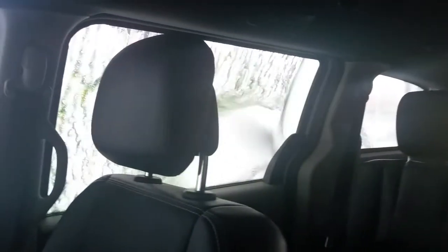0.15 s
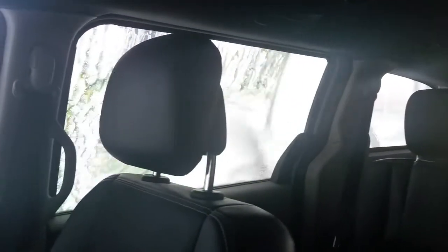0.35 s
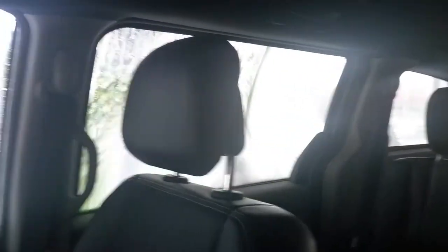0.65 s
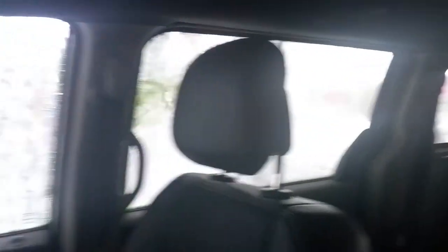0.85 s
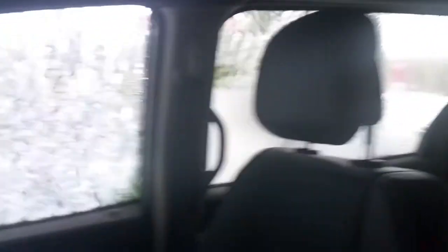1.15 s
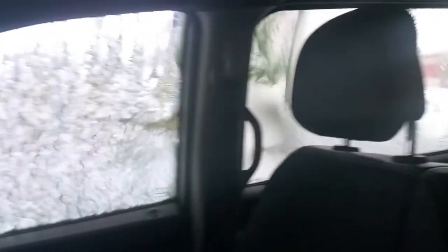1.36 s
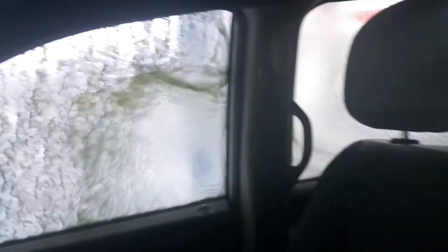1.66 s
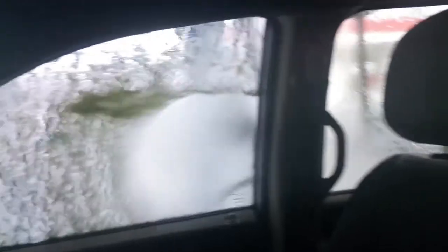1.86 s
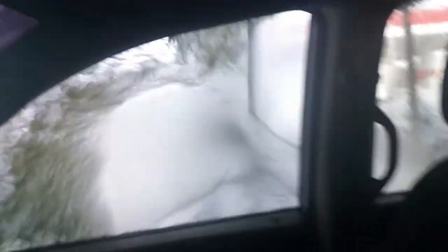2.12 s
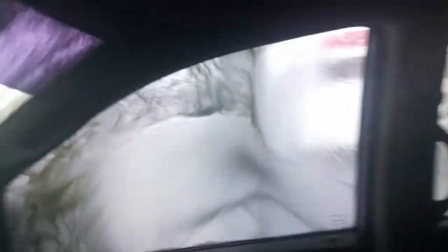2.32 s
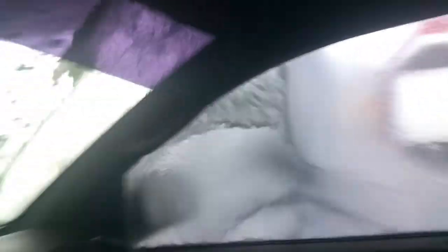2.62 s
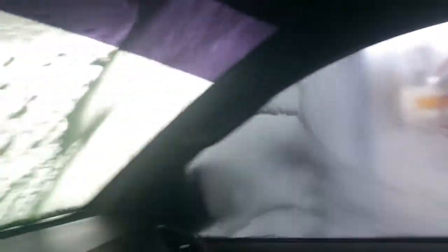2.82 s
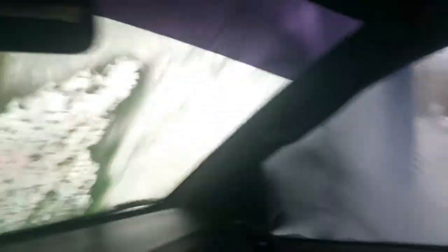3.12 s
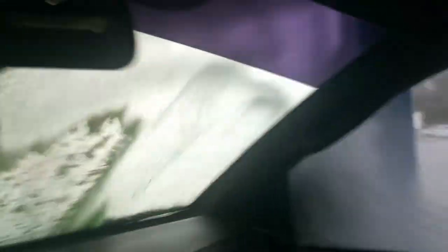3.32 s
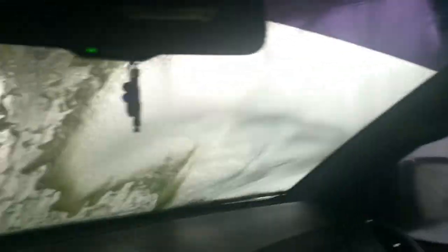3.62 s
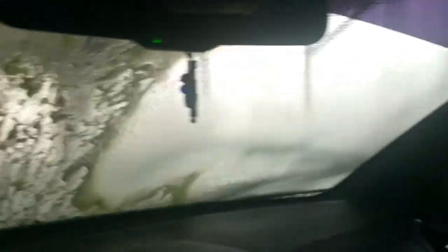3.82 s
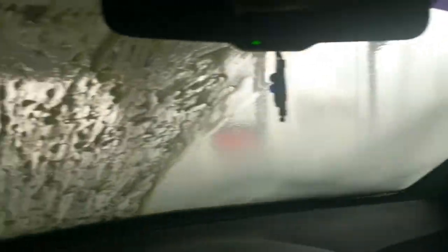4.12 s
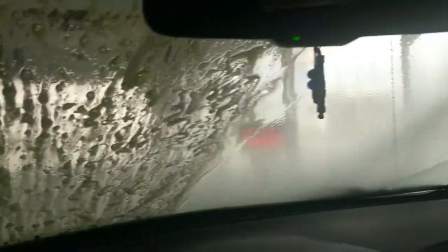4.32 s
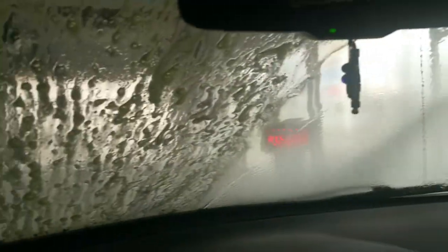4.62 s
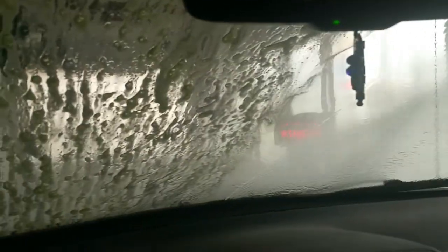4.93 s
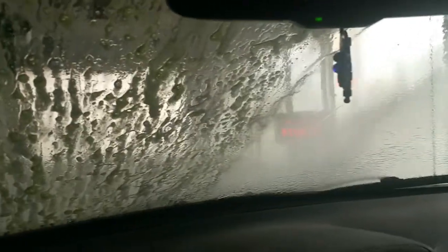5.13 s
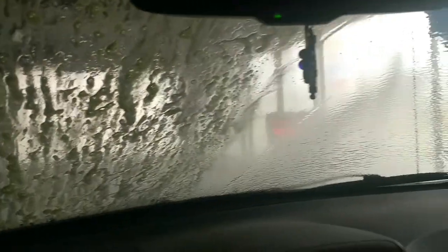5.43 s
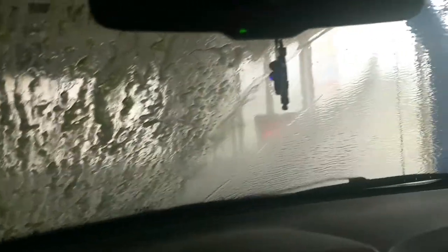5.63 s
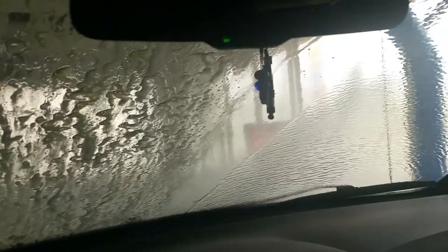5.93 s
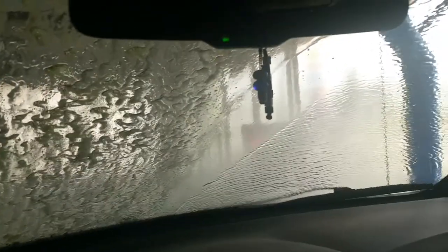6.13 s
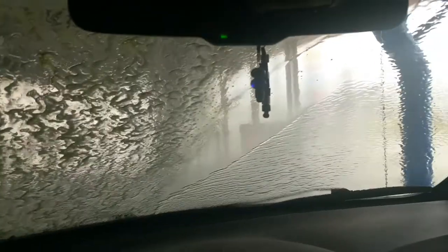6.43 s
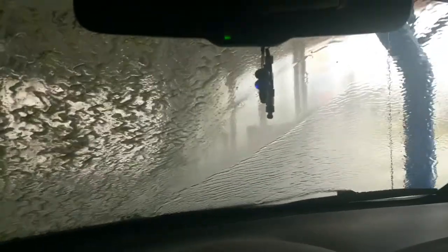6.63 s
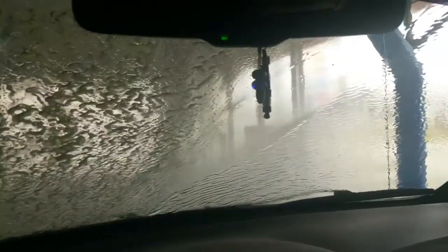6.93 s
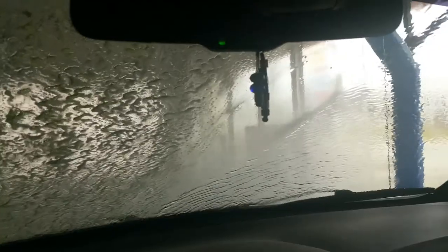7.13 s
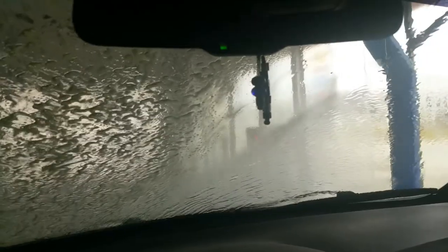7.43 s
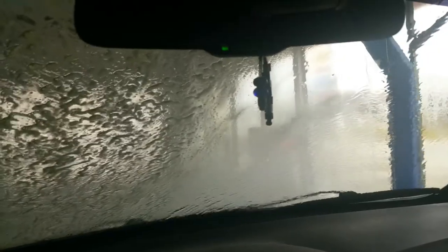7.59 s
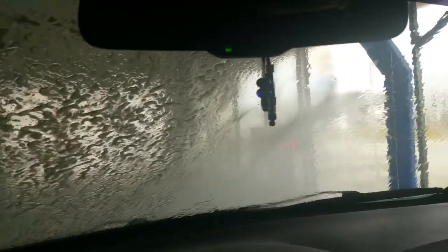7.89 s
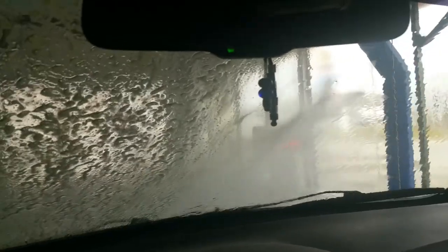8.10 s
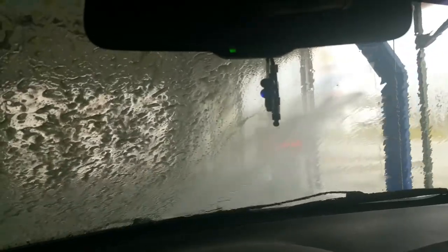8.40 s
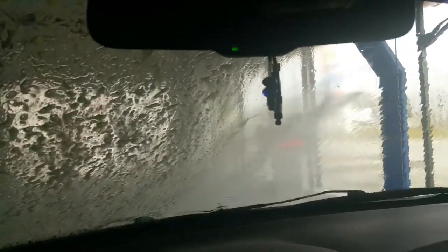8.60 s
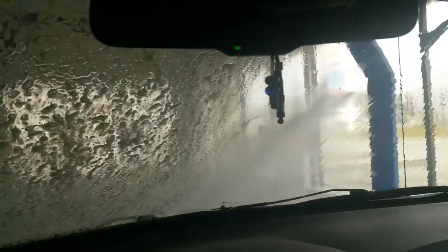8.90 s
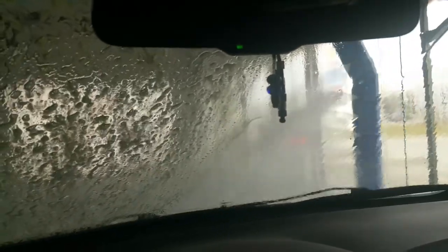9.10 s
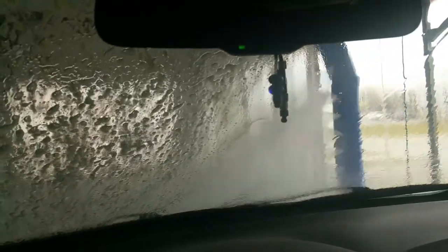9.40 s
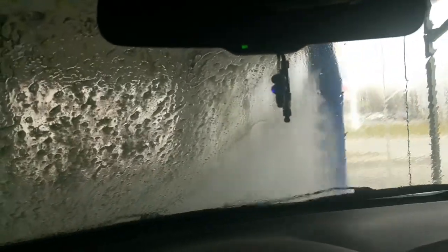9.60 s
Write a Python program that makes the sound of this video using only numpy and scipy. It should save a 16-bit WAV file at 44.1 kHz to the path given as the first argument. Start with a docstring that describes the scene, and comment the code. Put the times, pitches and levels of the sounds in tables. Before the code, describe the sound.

Car wash heard in a small enclosed cabin on a handheld phone: water roars steadily on doors and windows, panels thudding low beneath a grainy spray hiss. The sound surges as the jet crosses to the windscreen, then drops away within about a second and a half. Muffled rumbling, faint wavering motor tones and a weak dull hiss remain, with a small late knock.

```python
"""A low, uneven drumming under a steady hiss: the inside of a closed car swept by a high-pressure water jet.
The jet passes along the side windows, over the windscreen and off along the bonnet.
Its turbulent push, as noise through resonances, drums the panels and the cabin air in their modes;
dense random impulses make the droplets on the glass, shaped noise the duller splash through the shut body.
Faint wavering sines are motor tones, and a small knock falls late. Two close ports each colour the treble."""
import sys
import numpy as np
from scipy import signal
from scipy.fft import rfft, irfft, next_fast_len
from scipy.io import wavfile
from scipy.ndimage import map_coordinates

SR = 44100
rng = np.random.default_rng(int(sys.argv[2]) if len(sys.argv) > 2 else 0)


def wav_out(sig):
    """Save sig, one row per channel (or a flat mono array), as 16-bit PCM at SR to the path in sys.argv[1]."""
    wavfile.write(sys.argv[1], SR, np.round(np.clip(np.atleast_2d(sig).T, -1, 1) * 32767).astype(np.int16))


def magnitude_from_level(level_db):
    """Linear magnitude for a level in decibels (20 dB per decade)."""
    exponent = np.asarray(level_db, float) / 20
    return 10 ** exponent


N = 429975

# Push of the jet on the panels. Each row: time in seconds, level of the low modes in dB,
# level of the upper modes in dB.
PUSH = [(0.0, -20, -24), (0.32, -21, -22.5), (1.47, -20.5, -25), (2.09, -17.5, -20.5), (2.74, -17, -22.5),
        (2.99, -19.5, -25), (3.42, -21.5, -24.5), (3.96, -28, -31.5), (4.07, -28.5, -33.5),
        (4.56, -32, -39), (4.64, -25, -36.5), (5.21, -28, -38.5), (5.24, -29.5, -38), (6.19, -32.5, -42),
        (6.38, -31, -40.5), (7.0, -35.5, -45), (8.96, -37.5, -47), (9.67, -32, -40), (9.75, -32, -43)]
# Upper modes of the panels. Each row: frequency in Hz, width in Hz, then relative level in dB while
# the jet is on the rear door, the front door, the windscreen, the bonnet and the nose.
UPPER_MODES = [(364, 55, 2.5, 0, -8, -6, -8), (406.7, 47, 0.5, 3.5, -1.5, -1, -0.5),
               (465.5, 63, 0.5, 1, -3, -1.5, -6), (517, 65, 0.5, -4.5, -5.5, -7, -11),
               (575, 49, 2, -3.5, -5, -7.5, -7.5), (625, 94, -4, -4.5, -4, -6, -10),
               (669.4, 49, -3, -3.5, -5, -5.5, -5.5), (739.5, 83, -2.5, -2, -3.5, -6, -9),
               (813, 104, -4.5, -6.5, -6, -9, -10.5), (901, 220, -7.5, -10, -9, -19.5, -18),
               (1079, 310, -12, -9.5, -8.5, -14, -16), (1202, 300, -12.5, -10.5, -13, -18.5, -19)]
# Correlation of the two ports over pitch. Each row: frequency in Hz, left-right likeness [-1 to 1].
LIKENESS = [(45, 0.97), (85, 0.98), (130, 0.99), (190, .98), (260, 0.97), (450, 0.85), (680, 0.7),
            (900, 0.4), (1150, 0), (1500, -0.35), (2100, .27), (2900, -.15), (4000, 0), (15000, -0.03)]

LOW_PAN_DB = 1.5   # left against right
TONE_RISE_S, TONE_FALL_S = 0.066, 0.084   # ramps of swells and whines
TURN_FROM_S, TURN_TO_S = 2.7, 3.0   # the phone turns from the side windows to the windscreen
HALVES = np.array([[0.5], [-0.5]])   # shares a left-right difference between the ports


def rms_one(x):
    """Normalise the mean power: scale to rms 1."""
    return x / np.sqrt(np.mean(x ** 2) + 1e-20)


def over_time(times, values):
    """Linear interpolation in time: a value for every sample, times in seconds."""
    return np.interp(np.arange(N) / SR, times, values)


def in_time(rows):
    """Linear interpolation of each column of a table whose first column is time."""
    times, *columns = np.transpose(rows)
    return [over_time(times, column) for column in columns]


def at_hz(points, hz):
    """Interpolation on a logarithmic frequency axis: read a spectrum at hz."""
    table = np.array(points)
    return np.interp(np.log(hz), np.log(table[:, 0]), table[:, 1])


def drift(rate_hz):
    """Low-passed noise: a slow random course of rms 1 from two equal poles at rate_hz."""
    step = 40   # samples between slow values
    r = np.exp(-2 * np.pi * rate_hz * step / SR)
    noise = rng.standard_normal(N // step + 2002)
    slow = signal.lfilter([1], [1, -2 * r, r * r], noise)[2000:]   # drop the filter's start
    return np.interp(np.arange(N) / step, np.arange(len(slow)), rms_one(slow))


def resonance(x, hz, width_hz):
    """Damped resonance: a two-pole band-pass with gain 1 on top."""
    r = np.exp(-np.pi * width_hz / SR)
    top_gain = (1 - r * r) / 2
    return signal.lfilter(np.array([1, 0, -1]) * top_gain,
                          [1, -2 * r * np.cos(2 * np.pi * hz / SR), r * r], x)


def at_ports(pair, alike):
    """Mid-side mixing: two unrelated signals become left and right of the given correlation."""
    alike = np.clip(alike, -0.95, 0.999)
    mid = np.sqrt(1 + alike) * pair[0]
    side = np.sqrt(1 - alike) * pair[1]
    return (mid + side * np.array([[1], [-1]])) / np.sqrt(2)


def coloured(pair, spectrum):
    """Spectral shaping with the ports' likeness: the centre gets rms 1 in its body band, 1.7 to 5 kHz.
    Also returns the treble's power against the body's."""
    size = next_fast_len(N)
    hz = np.arange(1, size // 2 + 2) * SR / size
    sides = at_ports(rfft(pair, size), at_hz(LIKENESS, hz)) * magnitude_from_level(at_hz(spectrum, hz))
    out = irfft(sides, size)[:, :N]
    power = np.abs(sides.mean(axis=0)) ** 2
    body = power[(hz > 1700) & (hz < 5000)].sum()
    treble = power[(hz > 5000) & (hz < 15500)].sum()
    return out / np.sqrt(2 * body / size / N), treble / body


def facing_front():
    """Linear crossfade: 0 while the phone faces the side windows, 1 once it faces the windscreen."""
    return over_time([TURN_FROM_S, TURN_TO_S], [0, 1])


def rise_and_fall(start, length):
    """Trapezoidal envelope: rises, holds and stops."""
    end = start + length
    return over_time([start, start + TONE_RISE_S, end - TONE_FALL_S, end], [0, 1, 1, 0])


def turned(x):
    """Interaural-like delay: half the lag delays the left port, half advances the right."""
    # As the phone turns, sound reaches the left port later or sooner.
    # Each row: time in seconds, lag of the left port in ms.
    left_lag = [(0, .07), (1.2, .08), (1.7, -.12), (2.4, -.02), (3.0, .12), (3.8, .2), (4.7, .15), (7, .07),
                (9.75, .05)]
    lag_ms, = in_time(left_lag)
    shift = lag_ms / 1000 * SR / 2
    n = np.arange(N)
    left = map_coordinates(x[0], [n - shift], mode="nearest")
    right = map_coordinates(x[1], [n + shift], mode="nearest")
    return np.array([left, right])


def whines():
    """Frequency and amplitude modulation: thin motor tones that waver in pitch and strength."""
    # Faint motor hums and whines. Each row: start in seconds, length in seconds,
    # frequency in Hz, level in dB.
    motor_tones = [(4.45, 2.6, 672, -51.5), (4.6, 5.3, 251, -48), (5.4, 4.5, 129, -45),
                   (7.0, 2.9, 404, -56), (9.48, .3, 676, -48)]
    waver_hz, waver_db = 4.0, 2.5
    out = 0
    for start, length, hz, level_db in motor_tones:
        phase = 2 * np.pi * np.cumsum(hz + waver_hz * drift(6.03)) / SR
        level = np.sqrt(2) * magnitude_from_level(level_db + waver_db * drift(3.0))
        out = out + level * rise_and_fall(start, length) * np.sin(phase)
    return np.array([out, out])


def cabin_air():
    """Standing wave: the lowest front-to-back air mode booms softly, a little more under a hard push."""
    cabin_hz, width_hz, outer_width_hz = 44.7, 27, 96
    mean_db, waver_db = -40, -1.5
    follows = 0.18   # share of the push's swing in dB
    low_db, _ = in_time(PUSH)
    level_db = mean_db + follows * (low_db - low_db.mean()) + waver_db * drift(1.9)
    ring = resonance(rng.standard_normal((2, N)), cabin_hz, width_hz)
    ring = resonance(ring, cabin_hz, outer_width_hz)
    return magnitude_from_level(level_db + LOW_PAN_DB * HALVES) * rms_one(at_ports(ring, at_hz(LIKENESS, cabin_hz)))


def knock():
    """Impulse response: one small dull blow on the body sets all upper modes ringing at once."""
    knock_s, mode_db = 9.2, -41   # mode_db: each mode's height, roughly
    blow = np.zeros(N) + 1e-18
    blow[round(knock_s * SR):][:32] = np.hanning(32) / 16   # soft contact, under a millisecond
    out = 0
    for k, (hz, width_hz, *_) in enumerate(UPPER_MODES):
        r = np.exp(-np.pi * min(width_hz, 45) / SR)
        w = 2 * np.pi * hz / SR
        ring = signal.lfilter([0, np.sin(w)], [1, -2 * r * np.cos(w), r * r], blow)
        out = out + (-1) ** k * ring
    return magnitude_from_level(mode_db) * out


def swells():
    """Resonant filtering of noise: a band of the drumming or hiss stands out for a while."""
    # Bands that stand out. Each row: start in seconds, length in seconds, frequency in Hz,
    # width in Hz, level in dB.
    noise_swells = [(1.89, 0.48, 117, 47, -20.5), (2.424, 0.45, 433, 140, -25),
                    (2.17, 0.91, 738, 130, -34.5), (2.75, 0.74, 713, 120, -31.5),
                    (3.423, 0.424, 843, 150, -29), (3.95, 0.41, 552, 110, -38), (3.02, 0.4, 2300, 630, -35),
                    (4.05, .22, 3000, 900, -38), (2.8, 0.61, 3500, 1200, -40),
                    (3.9, 0.49, 4100, 1200, -44.5), (4.6, 0.39, 97, 11, -33),
                    (4.58, 0.42, 119.6, 18, -31.5), (4.88, 0.57, 131, 12, -31.5),
                    (3.95, 0.37, 312, 81, -32.5), (5.8, .75, 278, 13, -45), (5.894, 1, 218, 39, -38),
                    (6.154, 0.41, 173, 25, -39)]
    out = 0
    noise = rng.standard_normal((2, N))
    for start, length, hz, width_hz, level_db in noise_swells:
        band = rms_one(resonance(resonance(noise, hz, width_hz), hz, width_hz))
        level = magnitude_from_level(level_db) * rise_and_fall(start, length)
        out = out + level * at_ports(band, at_hz(LIKENESS, hz))
    return out


def splash():
    """Transmission loss: broadband splash noise dulled by the shut body, with its treble-to-body power."""
    # Spectrum through the body. Each row: frequency in Hz, relative density in dB per Hz.
    bay = [(820, -37), (1400, -0.5), (1610, 0), (1930, -0.5), (2300, 0), (2750, 2), (3360, -2),
           (4780, -11.5), (5840, -12), (7980, -26.5), (11900, -26.5), (15500, -37)]
    return coloured(rng.standard_normal((2, N)), bay)


def droplets(drops_per_s, spread_db, flutter_db):
    """Shot noise: impacts on the glass so dense that they nearly merge, with their treble-to-body power."""
    # Spectrum straight on the glass. Each row: frequency in Hz, relative density in dB per Hz.
    glass = [(820, -30), (1400, 1.5), (1640, -5), (2110, 1.5), (2360, -1), (3010, 0), (5780, -4.5),
             (6530, -3.5), (7290, -6), (8390, -10.5), (12100, -11.5), (15500, -18.5)]
    sizes = magnitude_from_level(spread_db * rng.exponential(1, (2, N))) * rng.choice([-1, 1], (2, N))
    hits = rng.random((2, N)) < drops_per_s / SR
    direct, bright = coloured(sizes * hits, glass)
    # as the jet moves off along the bonnet the droplets' top dulls
    below = signal.sosfiltfilt(signal.butter(2, 9800, fs=SR, output="sos"), direct)
    direct = direct - over_time([3.7, 4.6], [0, 0.46]) * (direct - below)
    flutter = magnitude_from_level(flutter_db * (drift(21) + drift(56)))   # the jet breaks up unevenly
    return flutter * direct, bright


def spray(drops_per_s, spread_db, flutter_db):
    """Power-weighted mixing: the larger the share of direct hits against splash, the brighter the hiss."""
    # Hiss of the water. Each row: time in seconds, body level in dB, treble in dB against the body.
    hiss_course = [(0.0, -33, -3.5), (0.08, -32.5, -1.5), (0.68, -33.5, -3), (1.33, -32, -4.5),
                   (1.5, -33.5, -4), (1.65, -34.5, -8), (1.76, -37.5, -5.5), (1.85, -35, -5.5),
                   (1.89, -30.5, -7.5), (2.0, -32.5, -4.5), (2.4, -31, -5.5), (2.8, -31, -4.5),
                   (2.86, -28.5, -5.5), (2.95, -30, -5), (3.04, -29.5, -4.5), (3.09, -28, -5.5),
                   (3.83, -33.5, -5), (4.24, -34.5, -6), (4.3, -36, -7.5), (4.48, -43.5, -8),
                   (4.63, -48.5, -8), (4.89, -48.5, -10.5), (5.21, -48, -7.5), (6.05, -51.5, -12),
                   (6.11, -51, -12.5), (8.66, -53, -12), (9.48, -51, -13), (9.75, -52, -12.5)]
    # Where the hiss lies. Each row: time in seconds, left-right difference in dB.
    hiss_pan = [(0, -1.5), (1.5, -1.5), (1.9, 0.5), (2.6, 0), (3.1, -2.5), (3.8, -0.5), (5.2, -2.5),
                (6.2, -1), (9.75, -0.7)]
    level_db, treble_db = in_time(hiss_course)
    pan_db, = in_time(hiss_pan)
    direct, bright = droplets(drops_per_s, spread_db, flutter_db)
    muffled, dull = splash()
    share = np.clip((magnitude_from_level(2 * treble_db) - dull) / (bright - dull), 0, 1)
    mixed = np.sqrt(share) * direct + np.sqrt(1 - share) * muffled
    return mixed * magnitude_from_level(level_db + pan_db * HALVES)


def patches(x, patch_db):
    """Time-varying band gain: broad bands of the hiss swell and sink slowly at random."""
    for hz in np.geomspace(1500, 9000, 9):
        x = x + (magnitude_from_level(patch_db * drift(5.4)) - 1) * resonance(x, hz, 0.22 * hz)
    return x


def echoes(x, echo_db):
    """Comb filtering: quick reflections off windows and roof, other ones at each port, ripple the spectrum."""
    count = 5
    out = x.copy()
    for side in range(2):
        lags_s = rng.uniform(0.002, 0.012, size=count)
        for lag in (lags_s * SR).astype(int):
            out[side, lag:] += magnitude_from_level(echo_db) * x[side, :-lag]
    return out / np.sqrt(1 + count * magnitude_from_level(2 * echo_db))   # keeps the power about level


def drummed(modes, wander_db, lined_db):
    """Modal superposition: turbulent push rings each mode, its share set by the jet's place; rms is 1."""
    # The jet dwells on rear door, front door, windscreen, bonnet and nose.
    # Each row: start in seconds, end in seconds.
    dwells = [(0, 1.5), (1.9, 2.25), (2.95, 4.38), (4.65, 6.93), (7.3, 9.75)]
    # Likeness lost once facing the windscreen. Each row: frequency in Hz, loss of likeness.
    front_spread = [(150, 0.026), (190, 0.067), (260, .02), (380, 0.29), (540, .12), (700, 0.19)]
    out, power = 0, 0
    turn = facing_front()
    push = rng.standard_normal((3, 2, N))   # neighbouring modes feel unrelated pushes
    for k, (hz, width_hz, *part_db) in enumerate(modes):
        gain = magnitude_from_level(over_time(np.ravel(dwells), np.repeat(part_db, 2)))
        ring = resonance(push[k % 3], hz, width_hz)
        # the trim passes little beside the mode
        ring = resonance(ring, hz, width_hz) + magnitude_from_level(lined_db) * ring
        alike = at_hz(LIKENESS, hz) - turn * at_hz(front_spread, hz)
        out = out + gain * magnitude_from_level(wander_db * drift(1.57)) * at_ports(ring, alike)
        power = power + gain ** 2 * width_hz
    return rms_one(out / np.sqrt(power))


def panels():
    """Forced vibration: doors, roof and windows drum under the jet, whose push comes in uneven surges."""
    # Low modes of the panels. Each row: frequency in Hz, width in Hz, then relative level in dB while
    # the jet is on the rear door, the front door, the windscreen, the bonnet and the nose.
    low_modes = [(86.6, 26, -14, -15, -6, -6.5, -7.5), (109.7, 37.5, 0.5, -14, -1, -2, -1.5),
                 (133.2, 30, -5.5, 0.5, -3.5, 2.5, 0.5), (173.4, 19.6, -16, -9, -3, 0, -2),
                 (200.5, 36.6, -0.5, -4.5, 0.5, -8.5, -6.5), (240.8, 52, -2.5, -4, -4, -3, -3),
                 (289.4, 38.4, -2.5, -5.5, -2.5, -12, -9.5), (326.5, 22, -15, -7.5, -6.5, -6.5, -13.5)]
    low_db, upper_db = in_time(PUSH)
    surge_db = 1.0 * drift(3.2)
    low = magnitude_from_level(low_db + surge_db) * drummed(low_modes, wander_db=1.26, lined_db=-20.0)
    upper = magnitude_from_level(upper_db + surge_db) * drummed(UPPER_MODES, wander_db=1.0, lined_db=-17.0)
    return low * magnitude_from_level(LOW_PAN_DB * HALVES) + turned(upper)


def shaded(x):
    """Diffraction shadow: the phone shades each port, and the balance over pitch changes as it turns."""
    # Balance facing the side windows, then the windscreen.
    # Each row: frequency in Hz, left-right difference in dB.
    facing_side_db = [(100, -.5), (200, -1), (680, 0.5), (1500, 2), (2100, 0.5), (3000, 3), (4200, -3),
                      (6000, -0.6), (11000, 1)]
    facing_front_db = [(100, 0.95), (200, -0.59), (680, -0.8), (1500, -2), (2100, -1.7), (3000, 2.4),
                       (4200, 2.2), (6000, -0.55), (11000, 0.7)]
    size = next_fast_len(N)
    hz = np.arange(1, size // 2 + 2) * SR / size
    spectrum = rfft(x, size)
    side, front = [irfft(spectrum * magnitude_from_level(at_hz(balance, hz) * HALVES), size)[:, :N]
                   for balance in (facing_side_db, facing_front_db)]
    turn = facing_front()
    return (1 - turn) * side + turn * front


def scene():
    """Linear superposition of all sources at the two ports."""
    hiss = spray(drops_per_s=36000, spread_db=1.5, flutter_db=0.52)
    hiss = echoes(patches(hiss, patch_db=0.5), echo_db=-22)
    bands_and_tones = turned(swells() + whines())
    return shaded(panels() + bands_and_tones + knock() + hiss) + cabin_air()


def top_cut(x):
    """Steep elliptic low-pass: next to nothing is left above 15.73 kHz."""
    return signal.sosfilt(signal.ellip(12, 0.3, 85, 15730, fs=SR, output="sos"), x)


def band_limit(x):
    """A steep low-pass at the top of the band."""
    return signal.sosfilt(signal.butter(12, 16450, fs=SR, output="sos"), x)


def record(dry):
    """Port resonance and self-noise: each port adds treble peaks and dips, then hiss; the top is cut."""
    # One list for the left port, one for the right.
    # Each row: frequency in Hz, width in Hz, gain in dB.
    port_peaks = [
        [(5970, 360, 4), (7140, 2300, -4.5), (12100, 5500, -5)],
        [(4160, 280, 0.5), (7220, 580, 5), (12000, 6400, -2.5)],
    ]
    mic_hiss_db = -73   # before the top cut
    out = dry.copy()
    for side, peaks in enumerate(port_peaks):
        for hz, width_hz, peak_db in peaks:
            out[side] += (magnitude_from_level(peak_db) - 1) * resonance(out[side], hz, width_hz)
    out += magnitude_from_level(mic_hiss_db) * rng.standard_normal(out.shape)
    return band_limit(top_cut(out))


dry = scene()
out = record(dry)
wav_out(out)
```